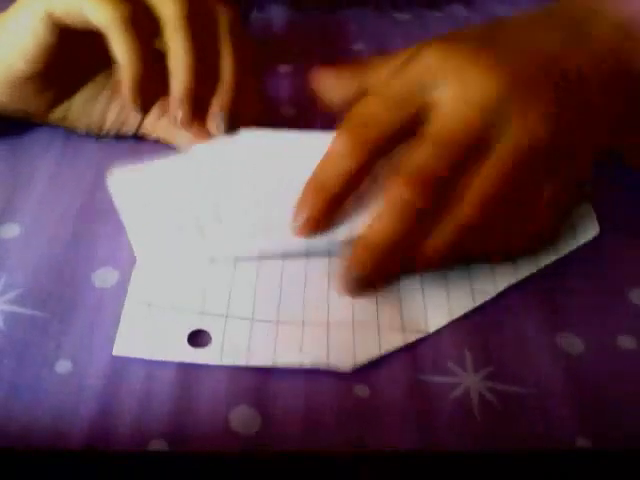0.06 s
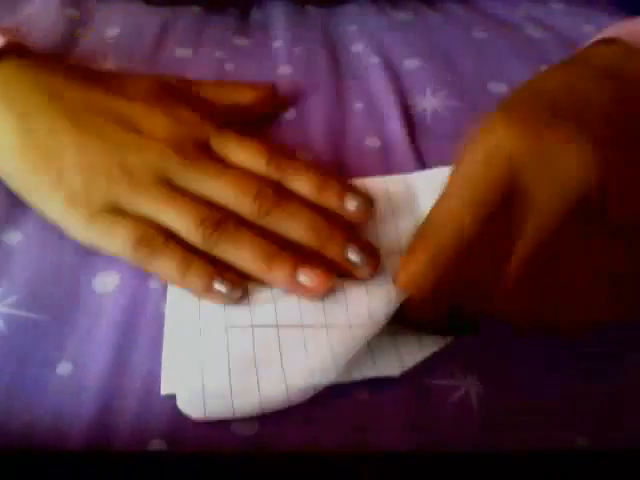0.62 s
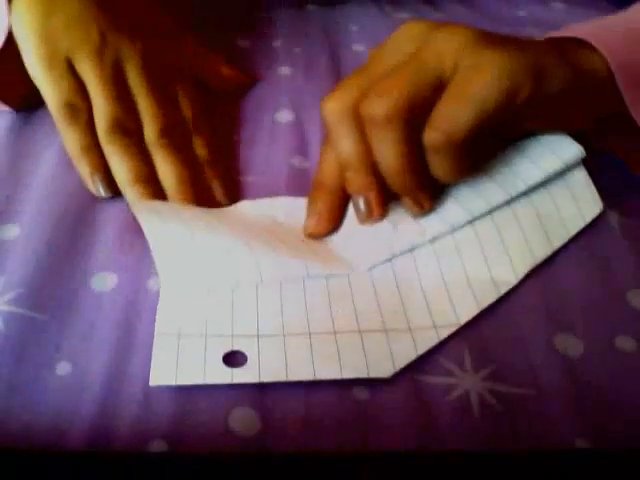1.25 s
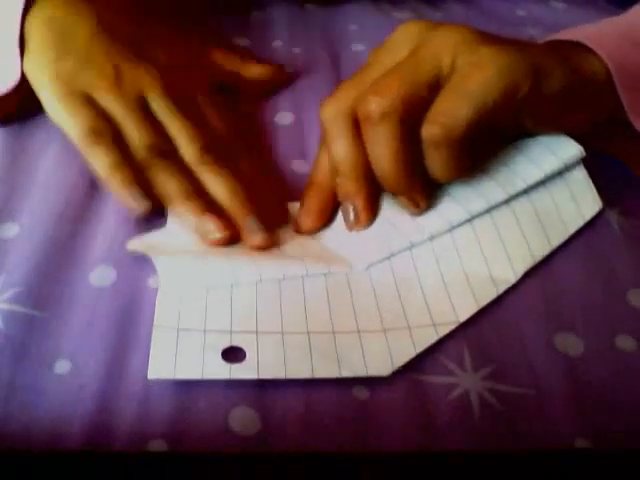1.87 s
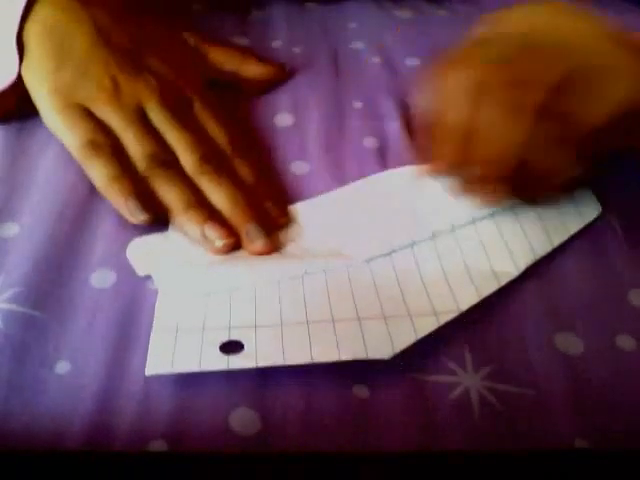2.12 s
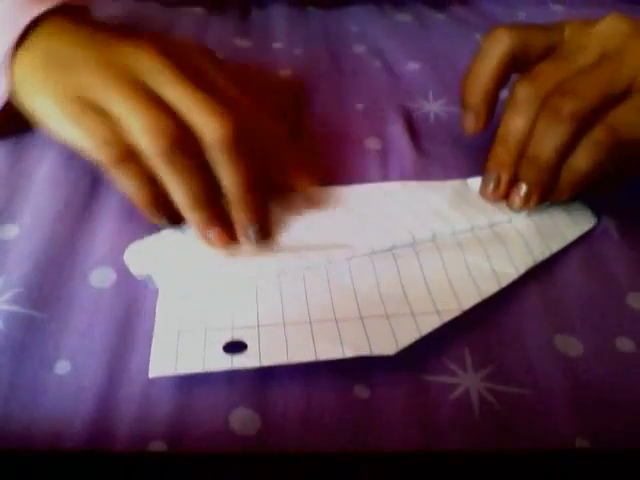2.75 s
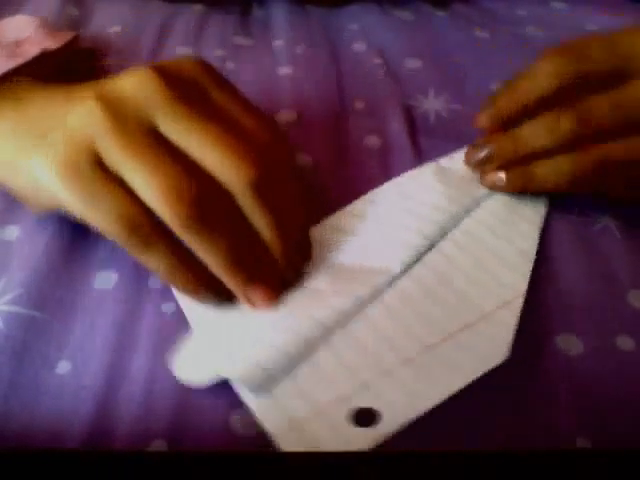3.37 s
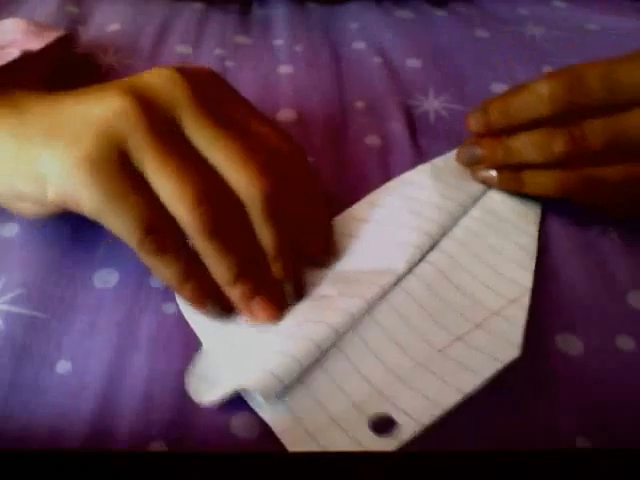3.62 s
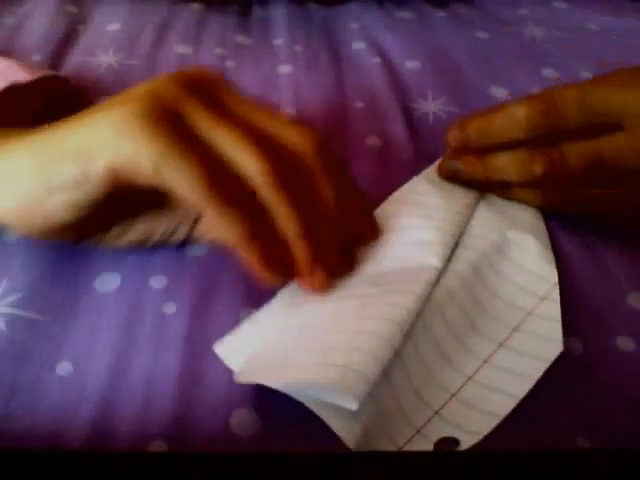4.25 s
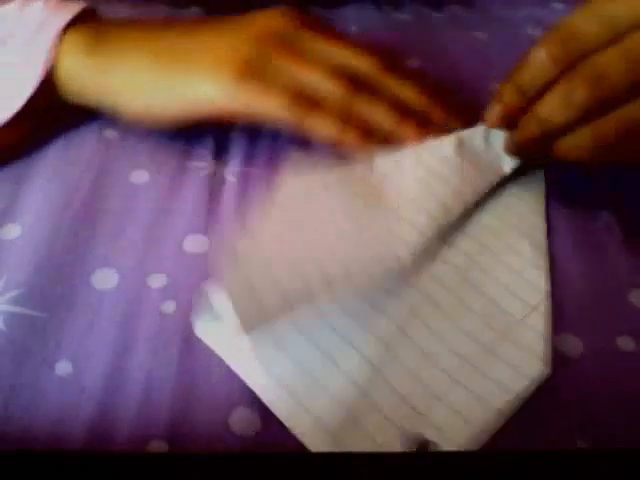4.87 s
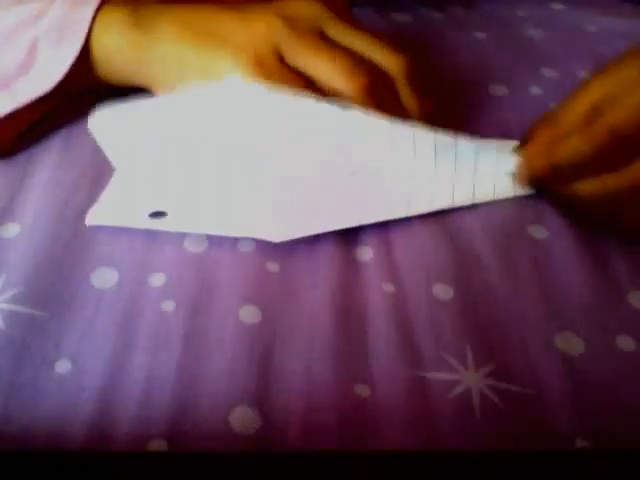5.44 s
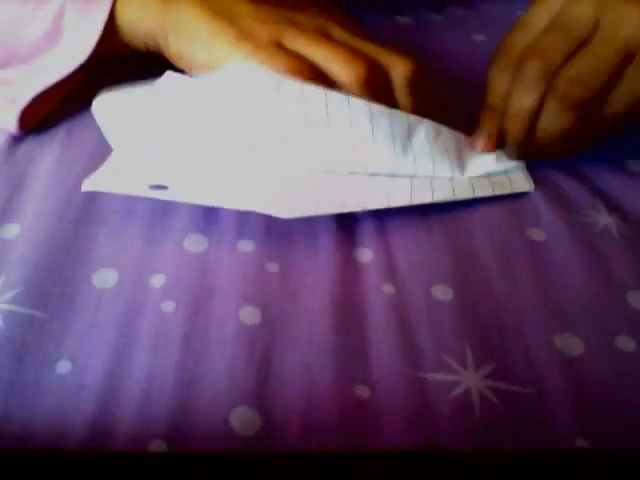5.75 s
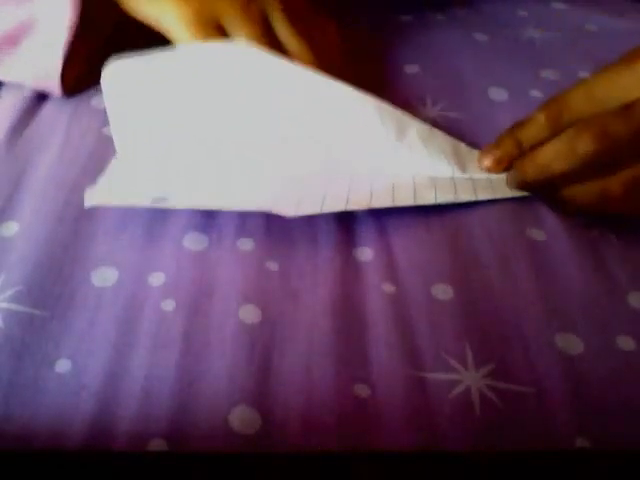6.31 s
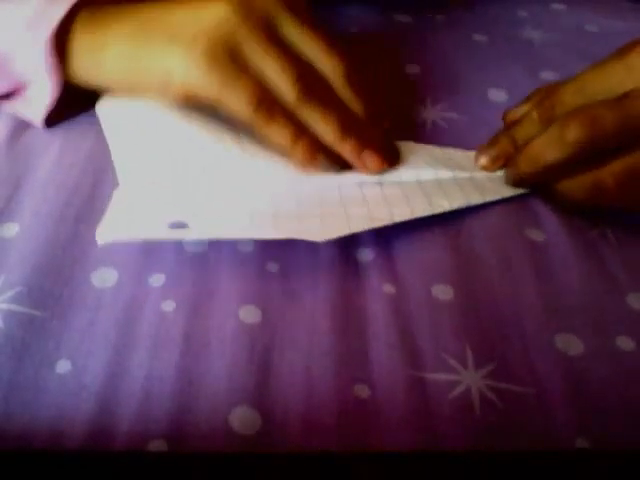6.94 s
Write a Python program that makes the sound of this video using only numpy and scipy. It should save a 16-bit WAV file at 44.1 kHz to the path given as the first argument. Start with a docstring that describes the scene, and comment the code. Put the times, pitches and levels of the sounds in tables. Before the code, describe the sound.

A sheet of notepaper is folded by hand on a bedspread, close to the microphone. It opens with a rustle and a small hollow knock, followed by sharp, irregular snaps and crinkles, loudest between 0.4 and 1.2 seconds. After a short lull, scattered crackles return around 1.8 seconds, and fingers hiss along a fold, with one strong snap near 2.5 seconds. From 3 to 4.3 seconds come softer sliding strokes and light ticks. A cluster of bright crackles follows around 4.5 seconds, then a louder rustle with a hollow pop at about 5.1. Lighter crinkling and little knocks continue, with a faint, brief squeak near 6.3 seconds and more snaps from 6.4 to 7. Now and then the hands press soft thumps and a low rumble from the bedding. The room is small and quiet, with a short reverberation and a very faint appliance hum.

```python
"""A rustle and a hollow knock, then sharp snaps: notepaper is folded into a paper plane on a bedspread,
close to a small microphone. Each snap is the sheet buckling and releasing its elastic energy.
Friction of fingers along the folds hisses, flexing paper crinkles, and stick-slip makes one squeak.
Air pockets in the folds resonate, and the hands press a soft rumble out of the bedding.
A small, quiet room adds a short reverberation and a faint appliance hum."""
import sys
import numpy as np
from scipy import signal
from scipy.fft import rfft, irfft, next_fast_len
from scipy.io import wavfile
from scipy.ndimage import map_coordinates

SR = 44100
rng = np.random.default_rng(int(sys.argv[2]) if len(sys.argv) > 2 else 0)


def int16_out(signal):
    """Quantize to a 16-bit WAV file."""
    q = np.round(np.clip(np.atleast_2d(signal).T, -1, 1) * 32767)
    wavfile.write(sys.argv[1], SR, q.astype(np.int16))


N = 308259

# buckles of the sheet: t/s, level over 5 ms/dB, brightness/(dB per octave)
BUCKLES = [(0.3231, -30, -3.5), (0.3847, -26.5, -5.5), (0.397, -32, -4), (0.423, -23.5, 1.5),
           (0.466, -34.5, -2), (0.582, -26, -2), (0.5903, -30, 7), (0.689, -21.5, 9),
           (0.7002, -29.5, -11.5), (0.782, -34, 0.5), (0.798, -37, -4.5), (0.8691, -33, -1),
           (0.9417, -25, 4), (1.0363, -26.5, -2), (1.0772, -18, -0.5), (1.154, -23.5, 1.5),
           (1.2189, -26.5, -1), (1.74, -42.5, -7), (1.7819, -34.5, 1), (1.924, -33.5, 1.5), (1.927, -31, 3),
           (2.179, -35, -3.5), (2.311, -29, -1), (2.341, -37, -5.5), (2.4491, -35.5, -1.5),
           (2.4818, -40.5, -3), (2.5456, -22, -0.8), (2.817, -50.5, -5.5), (3.1267, -39, -9),
           (3.303, -38.5, 1), (3.52, -39.5, -1), (3.5501, -36.5, 4.5), (3.8459, -37.5, 5.5),
           (4.4428, -36, 5), (4.4706, -34.5, 0.5), (4.5299, -31, 16), (4.548, -29, 3), (4.562, -33, -0.5),
           (4.583, -33, 3), (4.587, -25.5, 10.5), (4.624, -35.5, -0.5), (4.649, -39.5, 1), (4.6778, -30, 0),
           (4.876, -46, -3.5), (4.914, -37, -1), (4.947, -38, -3), (5.075, -30.5, 11), (5.1287, -29.5, -2),
           (5.3833, -33, 0.5), (5.4182, -41.5, 2), (5.6639, -36, -2), (5.676, -35.5, 0),
           (5.6922, -40, -1.5), (5.739, -35.5, -4), (5.8595, -40, -1.5), (5.9153, -38.5, -2.5),
           (5.9799, -39, -6), (6.019, -44, 0), (6.027, -39, -7), (6.0604, -43.5, -1), (6.0853, -45.5, 3),
           (6.128, -45.5, -3.5), (6.369, -45, -5.5), (6.4022, -37, -4.5), (6.4075, -29.5, 1.5),
           (6.492, -36.5, 2), (6.4994, -29, -1.5), (6.685, -37, 0), (6.6958, -29.5, -3.5), (6.705, -33, -5),
           (6.711, -35, -6), (6.7469, -43, -1.5), (6.7895, -37.5, -2), (6.851, -45, -14.5),
           (6.881, -37.5, -3), (6.9218, -33.5, 0), (6.9719, -34, -3), (6.9865, -33, 3)]
# resonances of the sheet: f/Hz, gain/dB
SHEET_RESPONSE = [(100, -12), (550, 0.5), (870, -13.5), (1150, -1), (1560, 0.5), (1840, -10.5), (2150, 1),
                  (2600, 0.5), (3080, -7), (3500, 4.5), (4080, -3.5), (4650, 0.4), (7400, -2.5)]
# a small buckle radiates little bass: f/Hz, gain/dB
BUCKLE_RADIATION = [(600, -4.5), (1800, 1.5)]
# a finger slides along a fold: t/s, duration/s, hiss level/dB
STROKES = [(0.188, 0.13, -47.5), (1.215, 0.097, -54.5), (1.29, 0.15, -73), (1.664, 0.1, -61),
           (2.007, 0.55, -48.5), (2.778, 0.12, -60), (2.944, 0.11, -58), (3.072, 0.18, -56.5),
           (3.236, 0.28, -46.5), (3.54, 0.25, -57.5), (3.7, 0.37, -46.5), (4.093, 0.14, -62),
           (4.394, 0.3, -47), (4.714, 0.39, -48), (5.224, 0.52, -54), (5.735, 0.21, -56.5),
           (6.113, 0.067, -53), (6.374, 0.14, -52.5), (6.611, 0.032, -40.5)]
# the sheet is bent and let go: t of tightest bend/s, build-up/s, rustle level/dB, hiss level/dB
BENDS = [(0.092, 0.33, -44.5, -41.5), (0.239, 0.22, -48, -50), (0.42, 0.21, -47, -47),
         (0.525, 0.23, -40.5, -42.5), (0.703, 0.25, -41, -42.5), (0.87, 0.12, -45.5, -51.5),
         (1.095, 1, -50.5, -51), (1.785, 0.049, -55, -55.5), (2.18, 0.38, -54, -57.5),
         (2.351, 0.33, -53, -71), (4.281, 0.11, -73, -48), (4.57, 0.13, -48.5, -69),
         (5.12, 0.18, -39.5, -35), (5.405, 0.11, -45, -47.5), (5.68, 0.18, -50, -45.5),
         (6.075, 0.85, -52, -65), (6.486, 0.18, -50.5, -65), (6.712, 0.19, -50, -73)]
# skin and cloth sliding over paper: f/Hz, relative spectral level/dB
HISS_SPECTRUM = [(700, -22), (1400, -5), (2500, -5.5), (5000, 0.5), (7300, 4)]
# the flexing sheet: f/Hz, relative spectral level/dB
RUSTLE_SPECTRUM = [(60, -20.5), (170, 8.5), (500, 2), (1100, 5), (3600, -7), (7500, -21.5)]
# a bulge of the sheet flips over: t/s, peak level/dB, f/Hz
BULGE_FLIPS = [(0.077, -33, 453), (0.942, -35, 451), (5.104, -29, 274), (5.971, -41.5, 560),
               (6.056, -36.5, 413), (6.141, -40, 560)]
# a fingertip drags the crease tight: t/s, rise time/s, f/Hz, level/dB
CREASE_SQUEAK = (6.28, 0.115, 3650, -57.5)
# air enclosed by the folds: start t/s, end t/s, f/Hz, bandwidth/Hz, linear gain
AIR_POCKETS = [(3.8, 4.095, 1490, 485, 0.93), (5.997, 7.0, 3260, 265, 1.3)]
# hands push on the bedding: t/s, level/dB
HAND_PRESSES = [(0.0, -49), (0.72, -49.5), (1.05, -65), (1.86, -72.5), (1.96, -53.5), (3.3, -67),
                (4.3, -53.5), (6.99, -55)]
# a hand or the flap lands on the bedding: t/s, level/dB
LANDINGS = [(0.421, -43.5), (0.692, -46.5), (1.929, -42.5), (5.098, -46), (6.681, -50.5)]
# the yielding bedding: f/Hz, relative spectral level/dB
BEDDING_SPECTRUM = [(25, 2), (55, -7), (95, -10), (190, -22.5), (1000, -35.5)]
# the quiet room: f/Hz, relative spectral level/dB
AIR_SPECTRUM = [(25, 3), (90, -5.5), (170, -22.5), (480, -12.5), (1500, -13.5), (2600, -29.5)]
# tones of an appliance: f/Hz, level/dB
HUM_TONES = [(91, -69.5), (1593, -79.5)]

TOP_HZ = 7700  # band limit
SHUDDER_S, SHUDDER_SPREAD = 0.0017, 0.25  # decay time of a snap and its natural-log spread
CHAIN_S, CHAIN_DB = 0.006, -15.5  # a buckle sets off smaller ones around it: time scale, level of each
SETTLE_DB, SETTLE_DB_PER_S = -27.5, 228  # the sheet settles with a short hiss after each snap
LAND_S, SLOWING_DB_PER_S, LIFT_S = 0.05, 15, 0.08  # a stroke lands, slows down and lifts off
SLIDE_RUSTLE_DB, BUMP_DB, CATCH_DB = -16, -17, -8  # relative to the hiss
SWELL_POWER, LET_GO_S = 1.83, 0.07  # sound grows as a power of the bend, until it is let go


def snaps(size=2048, chain_count=3):
    """Buckling frees elastic energy: a faint build-up, a crack, a quick shudder and a duller ring."""
    lead = size // 4
    norm_5ms = np.sqrt(0.005 * SR)
    t = (np.arange(size) - lead) / SR
    out = np.zeros(N + size)
    for s, db, brightness in BUCKLES:
        shudder, ring = rng.standard_normal((2, size))
        decay = SHUDDER_S * np.exp(SHUDDER_SPREAD * rng.standard_normal())
        build_up = amp(-13) * np.exp(t / decay / 2)
        shudder = unit(shudder * np.where(t < 0, build_up, np.exp(-np.abs(t) / decay)))
        ring = ring * (t > 0) * np.exp(-t / 0.0092)
        ring = unit(coloured(ring, lambda hz: -10 * np.log10(1 + (hz / 2200) ** 2)))
        # the quicker the buckle, the more of its energy lies in the first crack
        crack = 0.8 * unit(1.0 * (t == 0)) * SHUDDER_S / decay
        lags = rng.uniform(-1, 2.8, chain_count)
        chain = sum(np.roll(unit(crack + shudder), int(SR * CHAIN_S * lag)) for lag in lags)
        push = dispersed(crack + shudder + amp(CHAIN_DB) * chain) + amp(-16.5) * ring
        # the wave reflected from the nearest fold interferes, giving each snap its own comb
        round_trip_s = 0.0007205 * (1 + rng.random())
        comb = lambda hz: 3.8 * np.cos(2 * np.pi * hz * round_trip_s)
        tilt = lambda hz: brightness * np.log2(np.maximum(hz, 1100) / TOP_HZ)
        snap = coloured(push, lambda hz: radiated_db(hz) + tilt(hz) + comb(hz))
        out[round(s * SR) - lead:][:size] += amp(db) * norm_5ms * snap / np.linalg.norm(snap)
    return out[:N]


def dispersed(x, delay_s=0.001089):
    """Dispersion: bending waves run faster at high frequency, so a crack becomes a falling chirp."""
    relative_f = np.fft.rfftfreq(len(x), 1 / SR) / (TOP_HZ / 2)
    phase = np.pi * TOP_HZ * delay_s * (2 * np.sqrt(relative_f) - relative_f)
    return irfft(rfft(x) * np.exp(-1j * phase), len(x))


def radiated_db(hz):
    """Radiation from a small source: a buckle excites the sheet's resonances but gives little bass."""
    return along(SHEET_RESPONSE, hz) + along(BUCKLE_RADIATION, hz)


def rubbing():
    """Sliding friction makes a fine, dense hiss; flexure makes coarser, lower crinkles."""
    hiss_db, rustle_db = handling_levels()
    fine = slips(rate=2500, spread_db=3) + 0.31 * rng.standard_normal(N)
    coarse = crinkles(rate=300, spread_db=6.5, decay_s=0.0013) + 0.5 * rng.standard_normal(N)
    hiss = coloured(fine, lambda hz: along(HISS_SPECTRUM, hz) + 0.74 * along(SHEET_RESPONSE, hz))
    rustle = coloured(coarse, lambda hz: along(RUSTLE_SPECTRUM, hz) + along(SHEET_RESPONSE, hz))
    hiss = shifting_resonances(hiss, depth_db=5.2, span_hz=330, span_s=0.07)
    rustle = shifting_resonances(rustle, depth_db=4.5, span_hz=254, span_s=0.043)
    # small creases tick as the sheet flexes, and catch the moving hand
    ticks = crinkles(rate=70, spread_db=4, decay_s=0.0008)
    ticks = coloured(ticks, lambda hz: radiated_db(hz) + along(RUSTLE_SPECTRUM, hz) / 2)
    catches = coloured(crinkles(rate=45, spread_db=2, decay_s=0.0007), radiated_db)
    grip = amp(2.2 * wobble(60))  # flutters as the fingers drag
    flexing = grip * rustle + amp(-3) * ticks
    sliding = grip * hiss + amp(CATCH_DB) * catches + amp(BUMP_DB) * finger_bumps()
    return amp(hiss_db) * sliding + amp(rustle_db) * flexing


def handling_levels():
    """Incoherent sources add in power: strokes, bends and settling give hiss and rustle levels in dB."""
    t = np.arange(N) / SR
    hiss_power, rustle_power = np.full((2, N), 1e-12)
    for s, length, db in STROKES:
        landing = np.clip((t - s) / LAND_S, 0, 1) ** 2
        lifting = np.clip(1 - (t - s - length) / LIFT_S, 0, 1) ** 2
        stroke = landing * lifting * amp(db - SLOWING_DB_PER_S * np.maximum(t - s, 0))
        hiss_power += stroke ** 2
        rustle_power += (amp(SLIDE_RUSTLE_DB) * stroke) ** 2
    for s, build, rustle_db, hiss_db in BENDS:
        swell = np.interp(t, [s - build, s, s + LET_GO_S], [0, 1, 0]) ** SWELL_POWER
        rustle_power += (amp(rustle_db) * swell) ** 2
        hiss_power += (amp(hiss_db) * swell) ** 2
    settling = amp(SETTLE_DB - SETTLE_DB_PER_S * t[:SR // 2])
    for s, db, _ in BUCKLES:
        after = hiss_power[round(s * SR):][:len(settling)]
        after += (amp(db) * settling[:len(after)]) ** 2
    return 10 * np.log10(hiss_power), 10 * np.log10(rustle_power)


def slips(rate, spread_db):
    """A Poisson process: fibres catch about rate times a second, many weakly and a few strongly."""
    strength = amp(spread_db * np.minimum(rng.exponential(size=N), 2.7))
    caught = rng.random(N) < rate / SR
    return unit(caught * strength * rng.choice([-1, 1], N))


def crinkles(rate, spread_db, decay_s):
    """Damped vibration: small creases give way at random, each with a shudder that dies exponentially."""
    energy = signal.lfilter([1], [1, -np.exp(-2 / (decay_s * SR))], slips(rate, spread_db) ** 2)
    return unit(np.sqrt(energy) * rng.standard_normal(N))


def shifting_resonances(x, depth_db, span_hz, span_s, size=256):
    """Curvature shifts the sheet's resonances: patches of gain drift in time and frequency."""
    spectra = signal.stft(x, nperseg=size)[2]
    bins, frames = np.indices(spectra.shape)
    grid = [bins * SR / size / span_hz, frames * size / 2 / SR / span_s]
    knots = rng.standard_normal([int(axis.max()) + 2 for axis in grid])
    patches = unit(map_coordinates(knots, grid, order=1))
    gain = amp(depth_db * np.tanh(patches))
    return unit(signal.istft(spectra * gain, nperseg=size)[1][:N])


def finger_bumps(hz=370, count=420):
    """Impact excitation: finger pads jostle the hollow folds into knocks of random pitch and strength."""
    out = np.zeros(N + SR)
    for place, (pitch, strength) in zip(rng.random(count), rng.standard_normal((count, 2))):
        sound = knock(hz * 2 ** (np.clip(pitch, -2, 2) / 2))
        out[int(place * N):][:len(sound)] += np.exp(strength / 2) * sound
    return unit(out[:N])


def bulge_pops():
    """Snap-through: each bulge flips over with a hollow knock at its own pitch."""
    out = np.zeros(N)
    for s, db, hz in BULGE_FLIPS:
        sound = knock(hz)
        out[round(s * SR):][:len(sound)] += amp(db) * sound
    return out


def knock(hz, q=1, decay_s=0.008):
    """Damped resonance: a soft, ragged push on the sheet gives a dull knock, scaled to peak 1."""
    t = np.arange(SR // 12) / SR
    push = rng.standard_normal(len(t)) * t * np.exp(-2 * t / decay_s)
    body = signal.iirpeak(hz, q, SR)
    out = signal.lfilter(*body, signal.lfilter(*body, push))
    return out / np.abs(out).max()


def pocket_ring(x, fade_s=0.24):
    """Cavity resonance: the arched flap, and later the nearly finished plane, ring while enclosing air."""
    t = np.arange(N) / SR
    out = np.zeros(N)
    for start, end, ring_hz, width_hz, gain in AIR_POCKETS:
        closed = np.clip(1 + np.minimum(t - start, end - t) / fade_s, 0, 1)
        cavity = signal.iirpeak(ring_hz, ring_hz / width_hz, SR)
        out += gain * closed * signal.lfilter(*cavity, x)
    return out


def squeak(jitter=0.025, jitter_rate=500):
    """Stick-slip of skin on paper: a ragged tone with a weak octave swells and flattens with the pull."""
    start, length, hz, db = CREASE_SQUEAK
    pull = np.interp(np.arange(N) / SR - start, [0, length, length + LAND_S], [0, 1, 0])
    pitch_hz = hz * (1 - pull / 20 + jitter * wobble(jitter_rate))
    phase = 2 * np.pi * np.cumsum(pitch_hz) / SR
    tone = np.sin(phase) + amp(-10) * np.sin(2 * phase)
    roughness = np.abs(1 + wobble(jitter_rate / 2))
    return amp(db) * pull * unit(tone * roughness)


def bedding(thump_decay_s=0.017, thump_pitch_ratio=0.61):
    """Heavy damping: the mattress yields to the hands with a soft, lumpy rumble and a few dull thumps."""
    press_db = np.interp(np.arange(N) / SR, *np.transpose(HAND_PRESSES))
    out = amp(press_db + 2.8 * wobble(11)) * noise(BEDDING_SPECTRUM)
    t = np.arange(SR // 4) / SR
    for s, db in LANDINGS:
        impact = rng.standard_normal(len(t)) * np.exp(-t / thump_decay_s)
        thump = coloured(impact, lambda hz: along(BEDDING_SPECTRUM, hz / thump_pitch_ratio))
        out[round(s * SR):][:len(t)] += amp(db) * unit(thump)
    return out


def room(x, t60=0.3, treble_t60=0.14, places=6):
    """Reverberation: a short tail changes as the paper moves; the bedding absorbs its treble first."""
    t = np.arange(SR // 2) / SR
    place = np.arange(N) // (SR // places) % places  # the tails take turns, once round per second
    scatter = rng.standard_normal((places, len(t)))
    low = signal.sosfilt(signal.butter(4, 1900, fs=SR, output="sos"), scatter)
    tails = scatter * amp(-60 * t / treble_t60) + low * amp(-60 * t / t60)
    wet = sum(signal.fftconvolve(x * (place == k), tail / np.linalg.norm(tail))[:N]
              for k, tail in enumerate(tails))
    return amp(-16.5) * wet


def air_and_hum():
    """The noise floor: broadband room air and appliance tones made unsteady by phase modulation."""
    t = np.arange(N) / SR
    hum = sum(amp(db) * np.sqrt(2) * np.sin(2 * np.pi * hz * t + 0.9 * wobble(16))
              for hz, db in HUM_TONES)
    return amp(-67.5) * noise(AIR_SPECTRUM) + hum


def amp(db):
    """Amplitude ratio of a level in decibels."""
    return 10 ** (np.asarray(db) / 20)


def unit(x):
    """Normalisation to rms 1."""
    return x / np.sqrt(np.mean(x ** 2) + 1e-20)


def along(points, hz):
    """Interpolation of (f/Hz, level/dB) points on a logarithmic frequency axis."""
    f, db = np.transpose(points)
    return np.interp(np.log(hz + 1), np.log(f), db)


def wobble(rate):
    """Random modulation: a smooth curve through rate knots a second."""
    knots = rng.standard_normal(int(N * rate / SR) + 4)
    return map_coordinates(knots, [np.arange(N) * rate / SR])


def coloured(x, db_of, size=4096):
    """Minimum-phase filtering with gain db_of(f/Hz), rolling off above the band limit."""
    hz = np.fft.rfftfreq(size, 1 / SR)
    gain = amp(db_of(hz)) / (1 + (hz / TOP_HZ) ** 30)
    cepstrum = irfft(np.log(np.maximum(gain, 1e-6)))
    # folding the cepstrum onto positive time makes the filter causal
    cepstrum[1:size // 2] *= 2
    cepstrum[size // 2 + 1:] = 0
    impulse_response = irfft(np.exp(rfft(cepstrum)))
    return signal.fftconvolve(x, impulse_response)[:len(x)]


def noise(spectrum):
    """Spectral shaping of white noise, scaled to rms 1."""
    return unit(coloured(rng.standard_normal(N), lambda hz: along(spectrum, hz)))


def scene():
    """Superposition of paper, bedding and room at one microphone."""
    paper = snaps() + rubbing() + bulge_pops()
    paper = paper + pocket_ring(paper) + squeak()
    return (paper + room(paper) + bedding() + air_and_hum())[None]


def record(dry):
    """Band-pass response: the microphone rejects subsonic drift and treble above its band limit."""
    size = next_fast_len(N + SR // 2)
    hz = np.fft.rfftfreq(size, 1 / SR)
    high_pass = hz ** 2 / (hz ** 2 + 15 ** 2)
    low_pass = 1 / (1 + (hz / (TOP_HZ - 160)) ** 110)
    return irfft(rfft(dry, size) * high_pass * low_pass, size)[..., :N]


dry = scene()
out = record(dry)
int16_out(out)
```